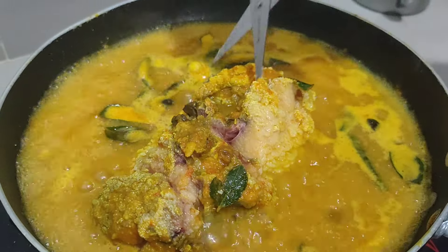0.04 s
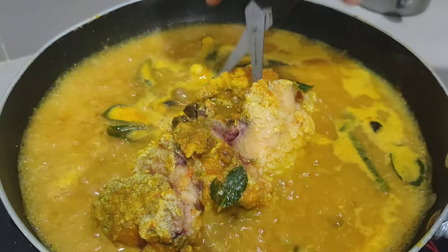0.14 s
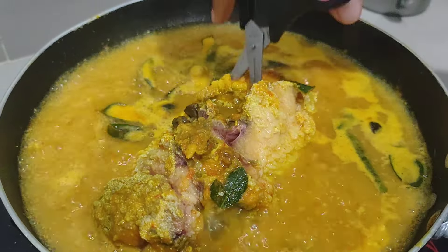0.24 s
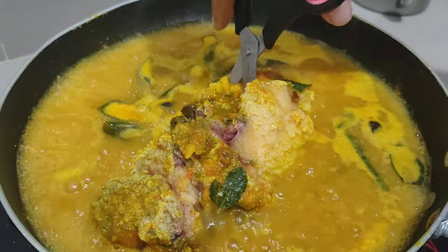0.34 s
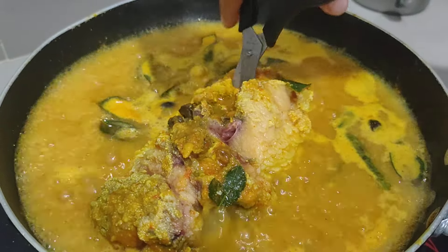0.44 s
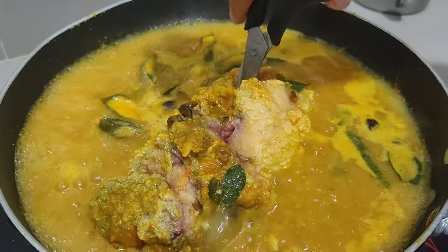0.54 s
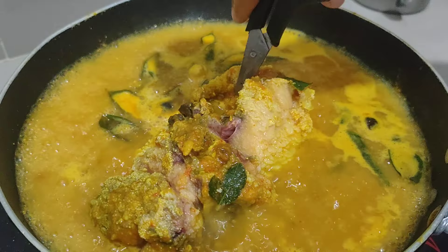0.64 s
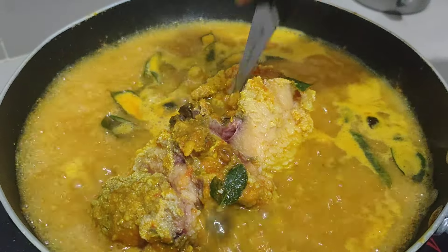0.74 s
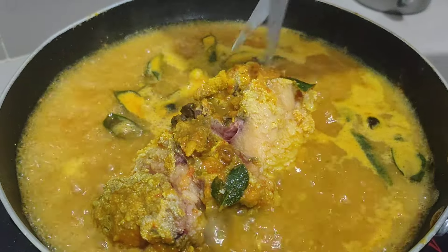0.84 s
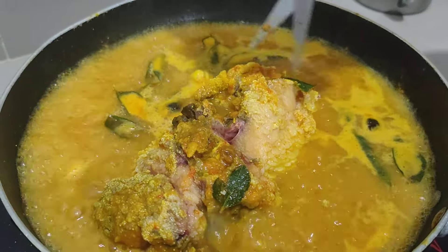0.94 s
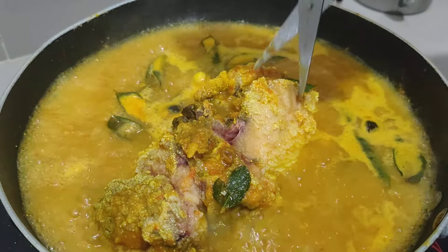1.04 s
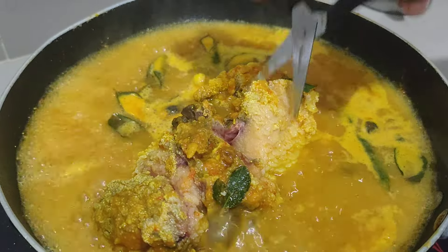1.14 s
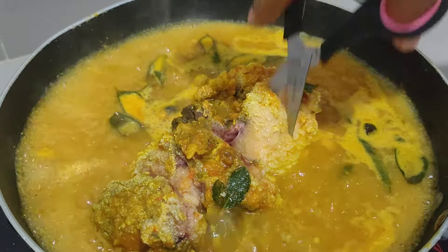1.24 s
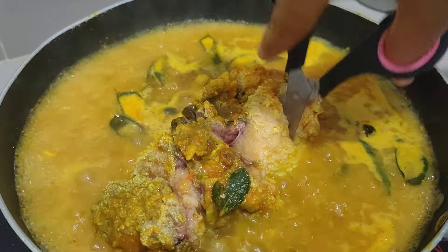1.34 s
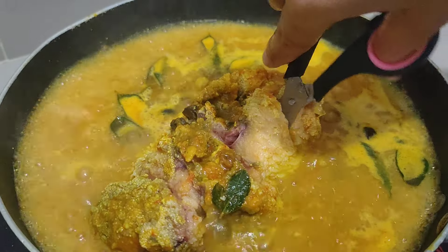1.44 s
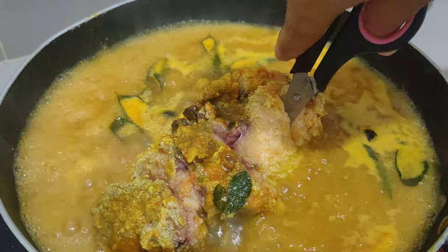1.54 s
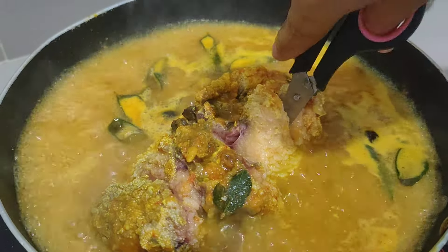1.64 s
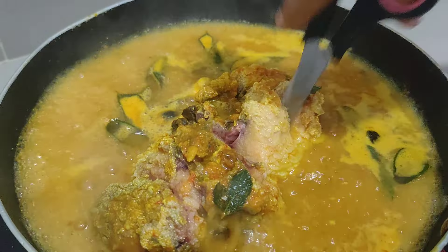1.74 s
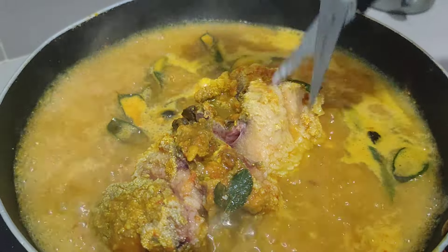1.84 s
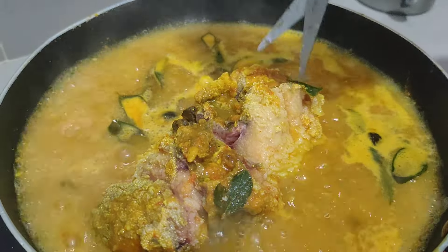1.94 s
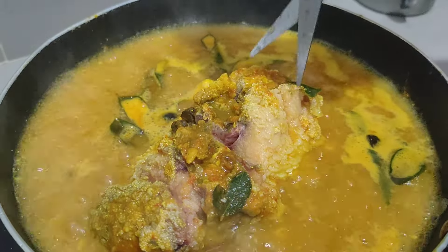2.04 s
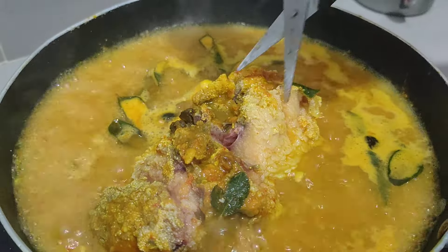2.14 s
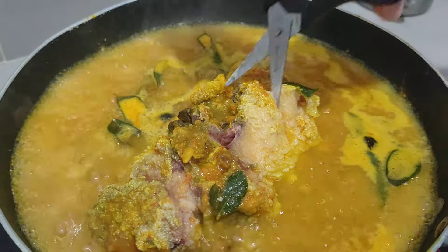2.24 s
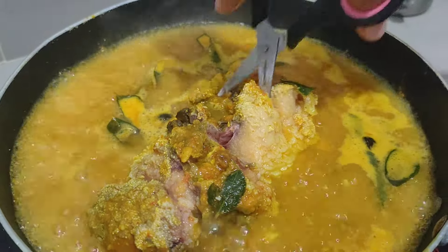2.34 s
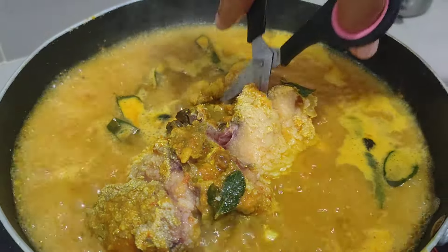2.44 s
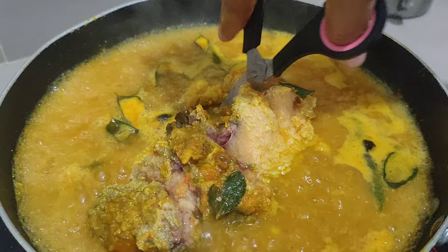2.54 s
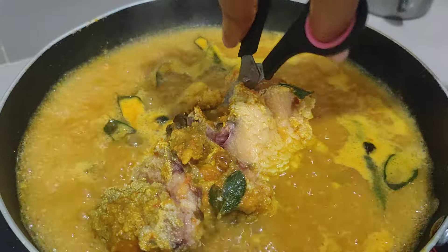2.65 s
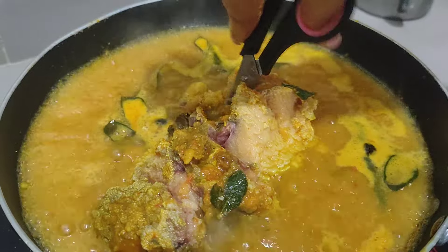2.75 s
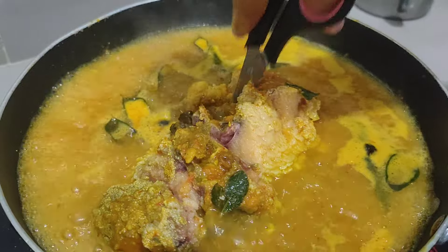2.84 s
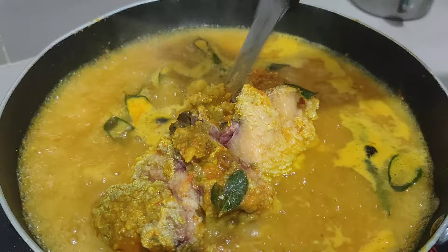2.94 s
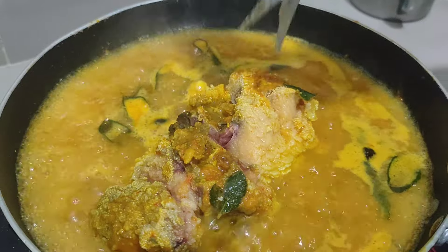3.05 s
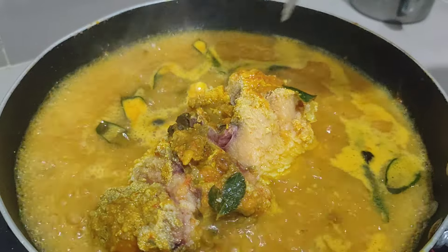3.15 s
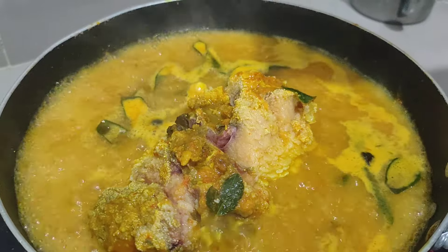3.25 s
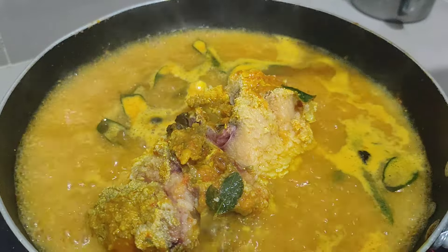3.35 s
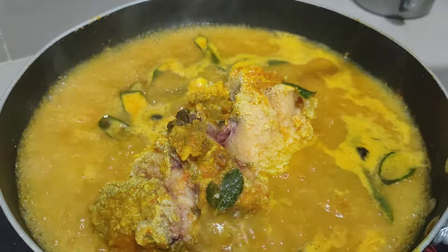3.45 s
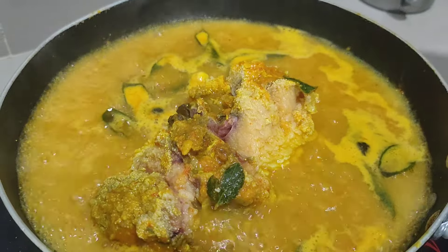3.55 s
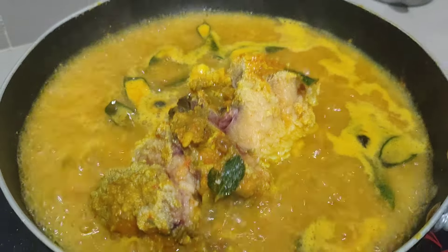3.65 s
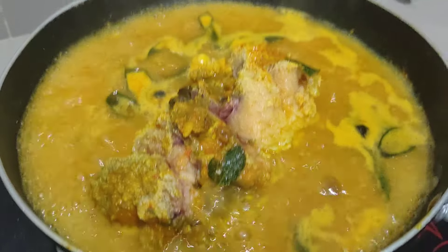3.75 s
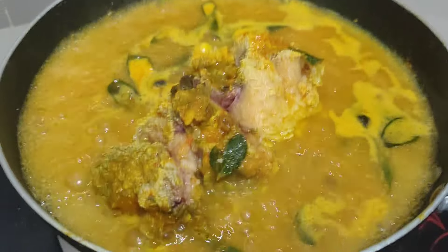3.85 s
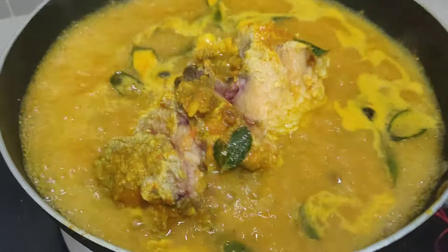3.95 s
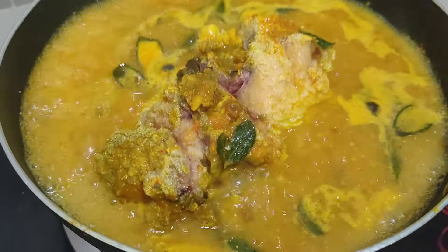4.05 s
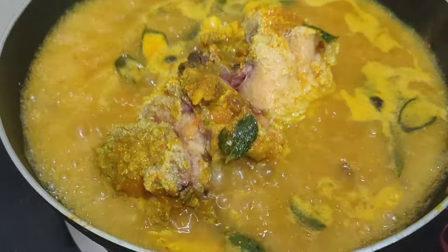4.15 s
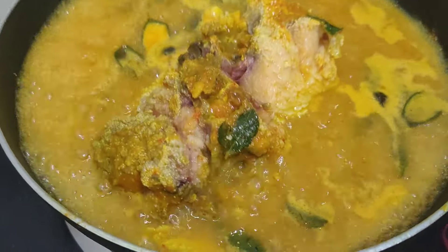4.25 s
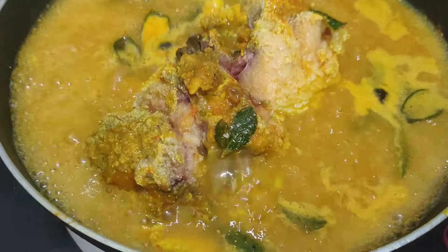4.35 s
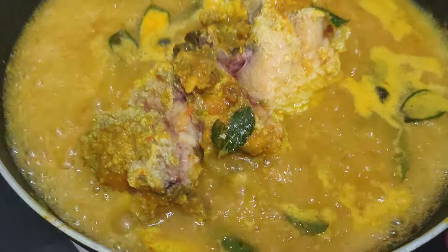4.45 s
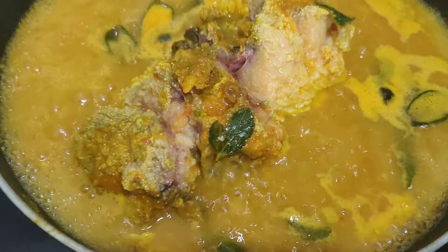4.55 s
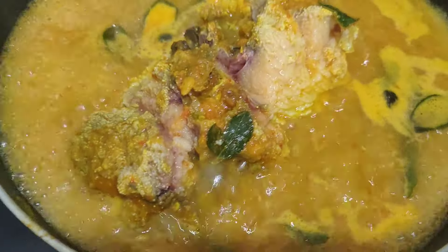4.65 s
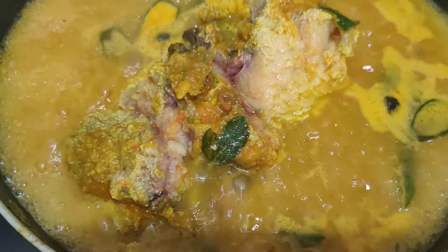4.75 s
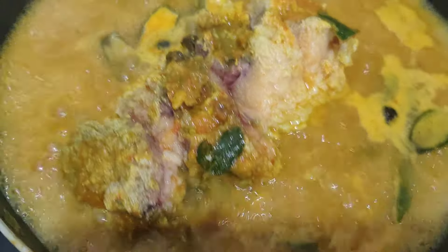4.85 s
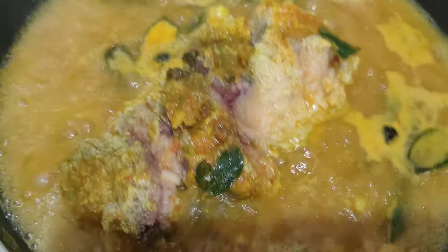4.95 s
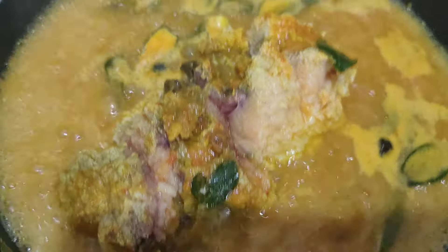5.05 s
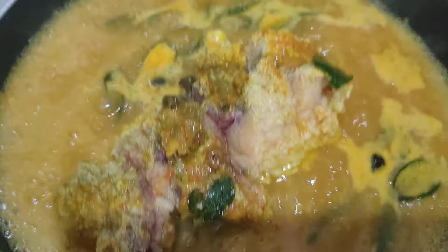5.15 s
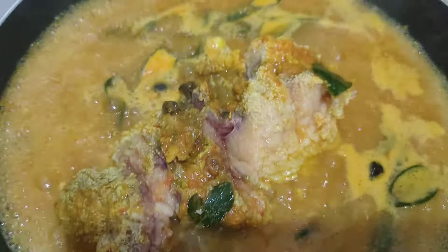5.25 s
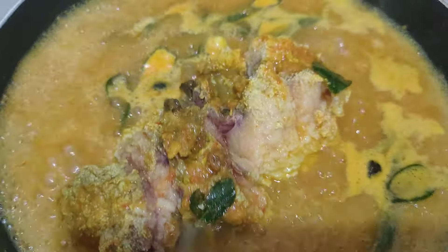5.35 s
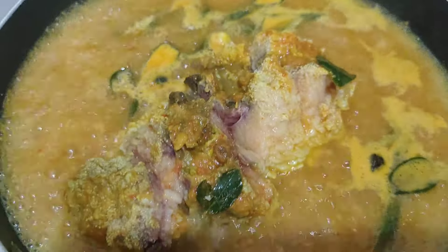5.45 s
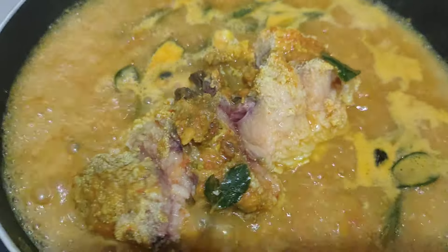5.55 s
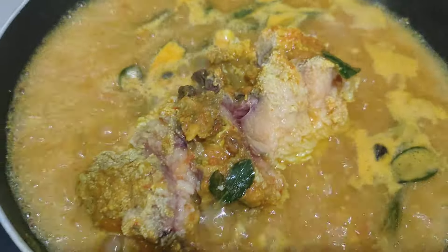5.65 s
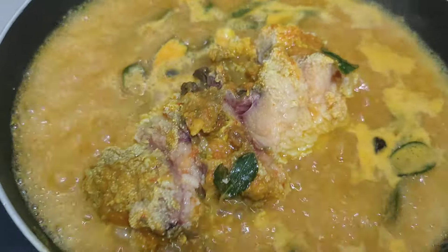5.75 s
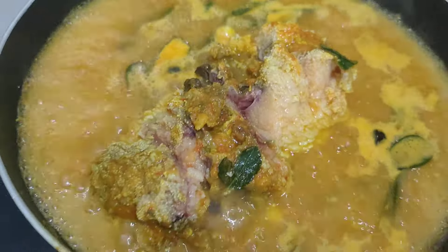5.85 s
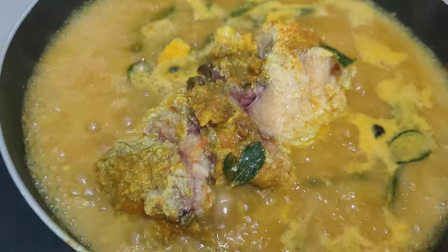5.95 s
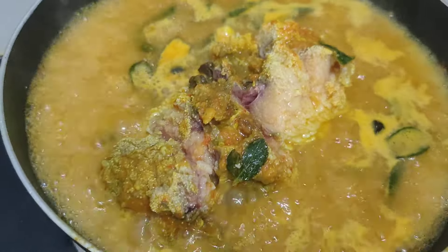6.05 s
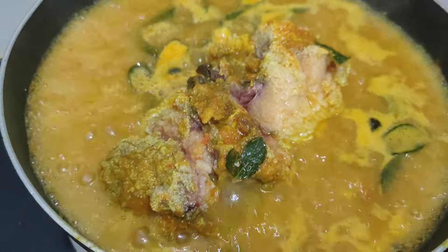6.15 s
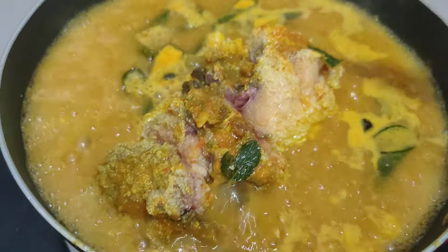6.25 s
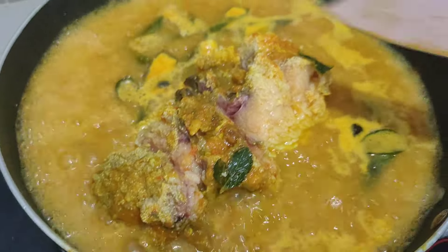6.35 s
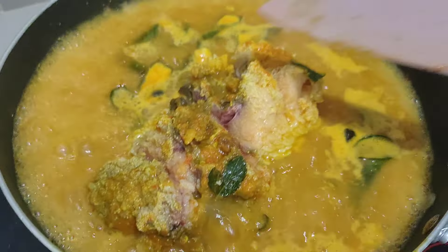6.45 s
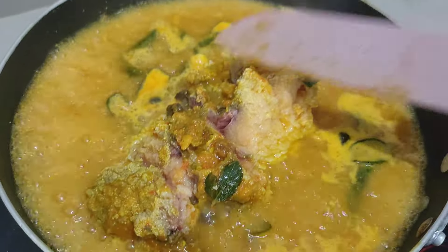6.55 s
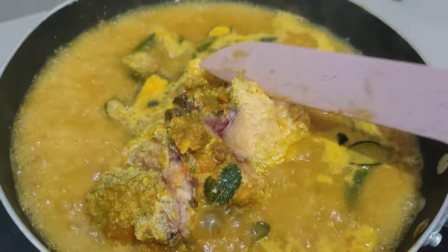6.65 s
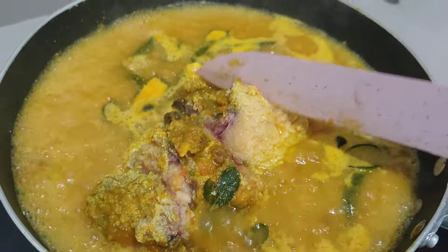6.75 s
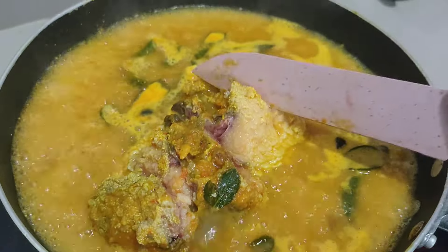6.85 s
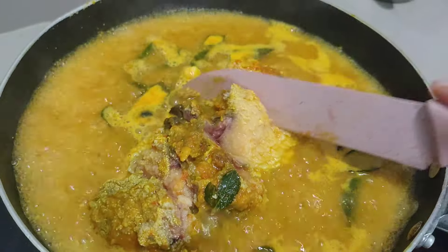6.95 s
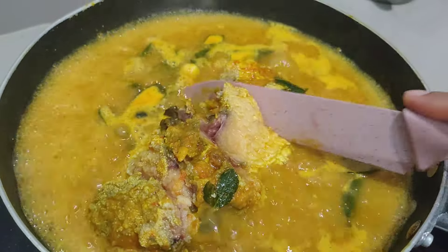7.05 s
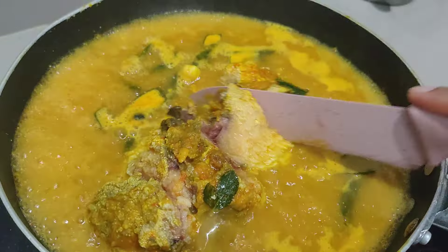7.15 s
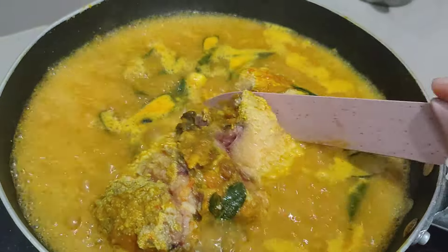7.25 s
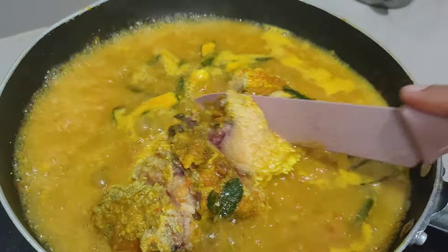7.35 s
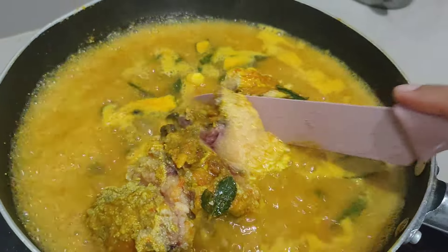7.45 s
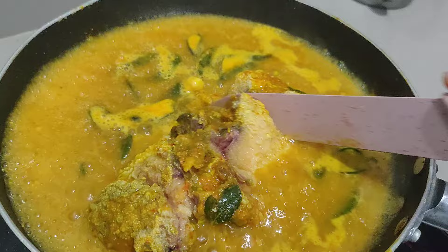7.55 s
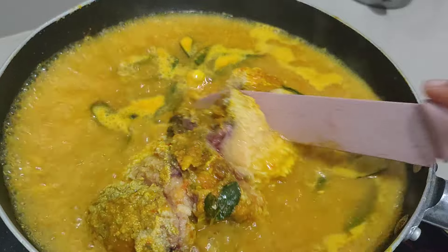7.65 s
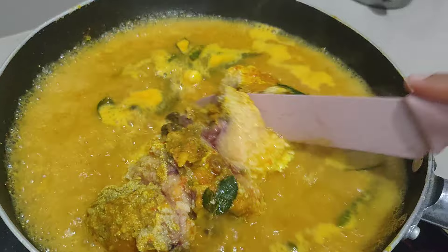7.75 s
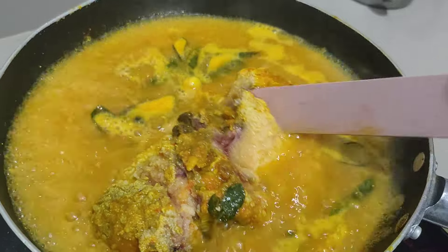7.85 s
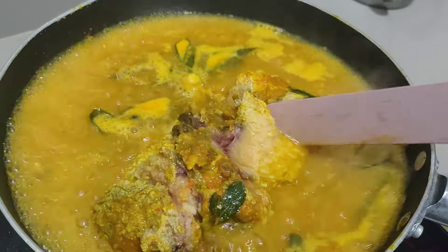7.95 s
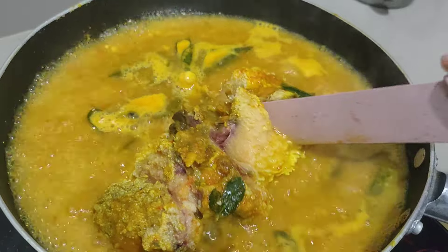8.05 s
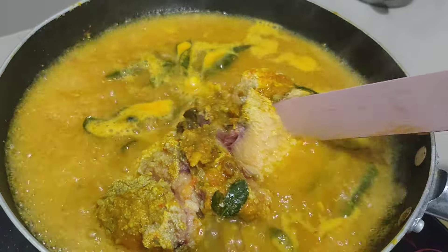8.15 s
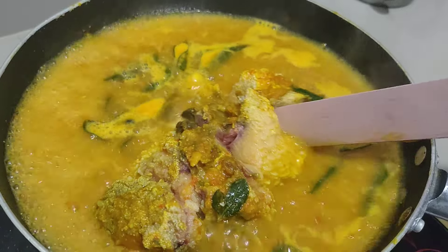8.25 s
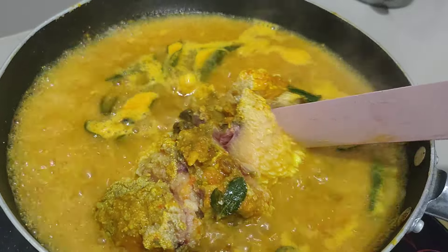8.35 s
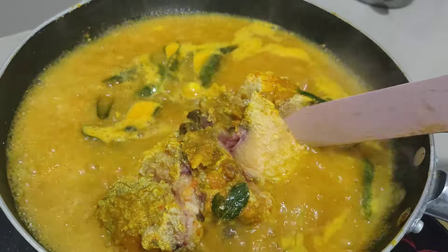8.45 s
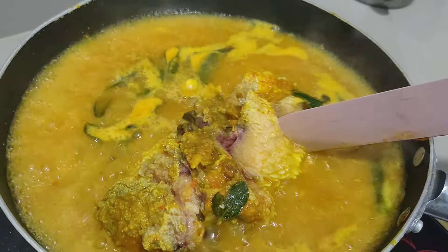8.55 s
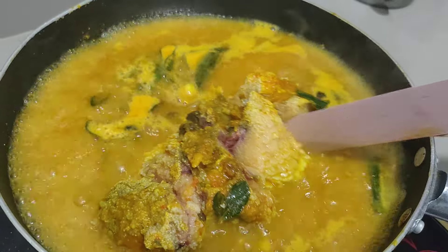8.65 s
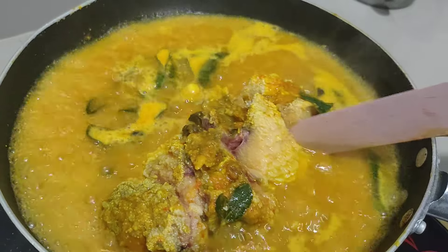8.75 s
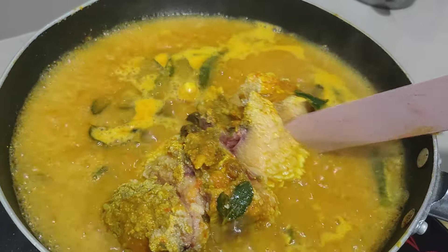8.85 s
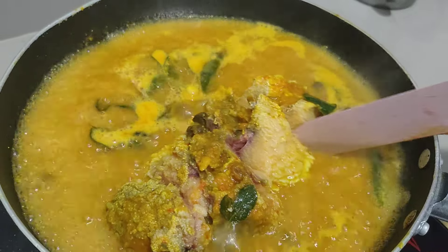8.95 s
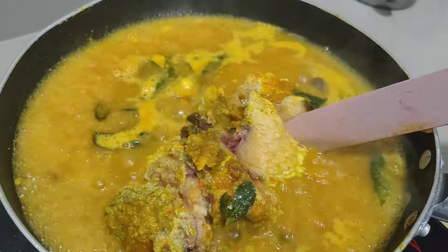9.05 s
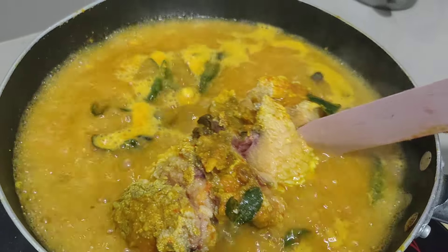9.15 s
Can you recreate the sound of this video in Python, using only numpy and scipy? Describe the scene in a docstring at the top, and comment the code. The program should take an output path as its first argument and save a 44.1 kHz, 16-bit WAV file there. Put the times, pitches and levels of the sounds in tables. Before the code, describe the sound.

Heard close up in a small kitchen, a pan of thick sauce bubbles throughout, with quick pops, a light hiss and droplets spitting on the hot rim. Three brief steel clicks come first as scissors cut a piece of meat. Later a plastic spatula gives a light tap, then a harder cluster of dry knocks on the pan, while the sauce keeps simmering.

```python
"""Thick curry simmers in a wide pan in a small kitchen. From the start, bubbles plop as their cavities
open and ring, steam surges drum on the base, and the hot rim sizzles and spits. In the first three
seconds kitchen scissors snip a piece of meat three times, the steel blades clicking shut.
Near 6.5 s a reaching arm stirs the air; then a plastic spatula pushes the meat and knocks on the pan,
hardest at 7.5 s. The steam surges under it, and the curry bubbles on to the end."""
import sys
import numpy as np
from scipy import signal
from scipy.fft import rfft, irfft, next_fast_len
from scipy.io import wavfile
from scipy.ndimage import uniform_filter1d

SR = 44100
rng = np.random.default_rng(int(sys.argv[2]) if len(sys.argv) > 2 else 0)


def store_wav(level_fs):
    """Save 16-bit WAV to argv[1]."""
    pcm = np.round(np.clip(np.atleast_2d(level_fs), -1, 1) * 32767)
    wavfile.write(sys.argv[1], SR, pcm.T.astype(np.int16))


N = 405279
TIME = np.arange(N) / SR


def from_db(db):
    """Decibels to gain."""
    return 10 ** (np.asarray(db) / 20)


def rms_one(x):
    """Scale to rms 1."""
    return x / np.sqrt(np.mean(x ** 2) + 1e-20)


def peak_one(x):
    """Scale to peak 1."""
    return x / np.abs(x).max()


def automation(rows):
    """Turn breakpoints (time_s, values...) into one curve for each value column."""
    times, *columns = np.transpose(rows)
    return [np.interp(TIME, times, column) for column in columns]


def add(out, start_s, sound):
    """Mix a sound in at a time."""
    i = int(np.clip(start_s * SR, 0, N - 1))
    out[i:i + len(sound)] += sound[:N - i]


def low_pass(x, hz, order=2):
    """Butterworth low-pass."""
    return signal.sosfilt(signal.butter(order, hz, fs=SR, output="sos"), x + 1e-18)


def high_pass(x, hz, order=2):
    """Butterworth high-pass."""
    return signal.sosfilt(signal.butter(order, hz, "high", fs=SR, output="sos"), x + 1e-18)


def coloured(x, spectrum):
    """Shape a steady sound with an EQ curve (freq_hz, gain_db); rms 1."""
    hz, db = np.transpose(spectrum)
    size = next_fast_len(N)
    bins_hz = np.maximum(np.fft.rfftfreq(size, 1 / SR), 1)
    gain = from_db(np.interp(np.log(bins_hz), np.log(hz), db, left=-120, right=-120))
    return rms_one(irfft(rfft(x, size) * gain, size)[:N])


def resonate(x, resonances):
    """Parallel resonances (pitch_hz, width_hz, gain_db) with alternating signs."""
    out = 0
    for k, (hz, width_hz, db) in enumerate(resonances):
        radius = np.exp(-np.pi * width_hz / SR)
        poles = [1, -2 * radius * np.cos(2 * np.pi * hz / SR), radius ** 2]
        band = (1 - radius ** 2) / 2 * signal.lfilter([1, 0, -1], poles, x + 1e-18)
        out = out + (-1) ** k * from_db(db) * band
    return out


def dying_noise(t60_s):
    """A burst of noise that falls 60 dB."""
    t = TIME[:int(t60_s * SR) + 2]
    return rng.standard_normal(len(t)) * from_db(-60 * t / t60_s)


def grains(per_s, spread_db):
    """Random clicks of uneven size."""
    clicks = (rng.random(N) < per_s / SR) * rng.choice([-1, 1], N)
    return clicks * from_db(spread_db * np.minimum(rng.exponential(1, N), 4))


def kitchen(x, wet_db=-17, t60_s=0.4, top_hz=6000):
    """A short diffuse tail comes off the tiles, 5 ms late."""
    tail = low_pass(dying_noise(t60_s), top_hz)
    tail = np.concatenate([np.zeros(SR // 200), tail])
    return from_db(wet_db) * signal.fftconvolve(x, tail / np.linalg.norm(tail))[:N]


# The dip in the pan's tone, shifting as the microphone leans in: time_s, centre_hz
NOTCH_SWEEP = [(0, 2400), (3.7, 2330), (4.8, 2970), (6.0, 2690), (6.8, 2870), (9.19, 2950)]


def pan_reflection(x, depth=0.8, half_width_hz=110):
    """A reflection off the pan partly cancels one narrow, moving band."""
    centre_hz, = automation(NOTCH_SWEEP)
    carrier = np.exp(2j * np.pi * np.cumsum(centre_hz) / SR)
    band = 2 * np.real(carrier * low_pass(x / carrier, half_width_hz, order=1))
    return x - depth * band


# Fader ride for the moving air: time_s, level_db
DRAUGHT_RIDE = [(0, -81.5), (6.5, -80), (6.57, -53), (6.66, -64), (6.75, -80), (9.19, -84.5)]


def draught():
    """Air stirred by the reaching arm makes a soft, deep puff."""
    level_db, = automation(DRAUGHT_RIDE)
    return from_db(level_db) * rms_one(low_pass(rng.standard_normal(N), 65))


def drumming(resonances, per_s, spread_db):
    """Soft random collapses excite a body's resonances, evened to rms 1."""
    drum = resonate(grains(per_s, spread_db), resonances)
    local_power = np.abs(uniform_filter1d(drum ** 2, size=3500))
    return drum / np.sqrt(local_power + 1e-12)


# Low tones of the pan's base: pitch_hz, width_hz, gain_db
BASE_TONES = [(97.3, 14, -0.5), (117.2, 26.5, -8.5), (157, 10.4, -4.5), (262.3, 41, -13)]
# Swells of steam, strongest when the spatula shoves the meat: start_s, hold_s, level_db
STEAM_SURGES = [(0.034, 0.088, -66.5), (0.476, 0.05, -59.5), (0.97, 0.09, -64.5), (1.217, 0.12, -57.5),
                (1.615, 0.06, -63), (1.805, 0.037, -59), (2.294, 0.11, -55), (2.564, 0.073, -52.5),
                (3.056, 0.16, -53.5), (3.7, 0.11, -54.5), (3.925, 0.12, -55), (4.117, 0.14, -55),
                (4.558, 0.036, -58.5), (4.754, 0.035, -54), (4.92, 0.04, -53.5), (5.052, 0.035, -50),
                (5.232, 0.062, -52.5), (5.43, 0.06, -55.5), (5.583, 0.19, -52.5), (5.785, 0.15, -50.5),
                (6.238, 0.12, -52), (6.666, 0.054, -54.5), (6.76, 0.11, -49), (7.152, 0.04, -54.5),
                (7.296, 0.038, -50), (7.57, 0.023, -46), (7.785, 0.065, -45.5), (8.218, 0.033, -56.5),
                (8.412, 0.06, -58), (8.617, 0.13, -56), (8.904, 0.069, -56.5), (9.12, 0.068, -57)]


def steam_rumble(resting_db=-76, rise_20db_s=0.089, fall_20db_s=0.19):
    """Steam pockets collapse against the base and drum on it; each surge swells, holds and ebbs."""
    power = from_db(resting_db) ** 2
    for start_s, hold_s, level_db in STEAM_SURGES:
        fade_in = np.maximum(start_s - TIME, 0) / rise_20db_s
        fade_out = np.maximum(TIME - start_s - hold_s, 0) / fall_20db_s
        power = power + from_db(level_db - 20 * (fade_in + fade_out)) ** 2
    return np.sqrt(power) * drumming(BASE_TONES, per_s=460, spread_db=3)


# Tones of the steam pockets round the meat: pitch_hz, width_hz, gain_db
GURGLE_TONES = [(240.5, 54, -2.5), (290, 50, -2), (357, 30, -2)]
# Fader ride for the heaving sauce, with a few lulls: time_s, level_db
HEAVE_RIDE = [(0.0, -56), (0.26, -77), (0.44, -79), (0.54, -60), (1.12, -67), (1.5, -61.5), (2.0, -64),
              (2.56, -60), (5.7, -62), (6.1, -67.5), (7.3, -61.5), (7.47, -84), (7.66, -48.5),
              (8.02, -82.5), (8.18, -87), (8.26, -60.5), (9.19, -64.5)]


def gurgle(gulps_per_s=5.5, swing_db=4.5, unevenness=0.25):
    """Larger steam pockets gurgle round the meat as the sauce heaves in uneven gulps."""
    heave_db, = automation(HEAVE_RIDE)
    gaps_s = np.exp(unevenness * rng.standard_normal(100)) / gulps_per_s
    gulp_count = np.interp(TIME, np.cumsum(gaps_s) - gaps_s[0], np.arange(len(gaps_s)))
    gulp_db = swing_db * np.cos(2 * np.pi * gulp_count)
    return from_db(heave_db + gulp_db) * drumming(GURGLE_TONES, per_s=300, spread_db=3.5)


# EQ of the froth, coloured by the pan's hollow: freq_hz, gain_db
FROTH_EQ = [(240, -42), (400, -18), (450, -12), (543, 4), (635, -6), (896, 6), (1020, -16.5), (1190, -1),
            (1320, -13), (1500, 7), (1640, -11.5), (1800, 4), (1980, 0), (2370, -4), (2600, -6.5),
            (3380, -45.5), (5720, -120)]


def froth(bubble_db, trim_db=-5):
    """Countless bubbles too small to tell apart blur into a bed of noise."""
    return from_db(bubble_db + trim_db) * coloured(rng.standard_normal(N), FROTH_EQ)


# EQ of the foam on the rim: freq_hz, gain_db
SIZZLE_EQ = [(1800, -27), (2370, -11), (2620, -8), (3200, -6), (4050, -4.5), (4600, -7.5), (5150, -13),
             (5800, -5.5), (6550, 1), (7150, 2), (7600, -8), (8400, -35)]


def sizzle(level_db, hiss_db=-1, crackle_db=-7):
    """Fine foam dries on the hot rim: a smooth hiss with tiny ticks in it."""
    hiss = coloured(rng.standard_normal(N), SIZZLE_EQ)
    crackle = coloured(grains(per_s=900, spread_db=7.5), SIZZLE_EQ)
    return from_db(level_db) * (from_db(hiss_db) * hiss + from_db(crackle_db) * crackle)


def faint_spits(per_s=3.2, level_db=-41, spread_db=4.5, pitch_hz=3230, octaves=0.29, colour_db=9):
    """Cues for small droplets at random moments, each with its own size, pitch and colour."""
    count = int(per_s * TIME[-1])
    starts_s = rng.uniform(0, TIME[-1], count)
    return [(start_s, level_db + spread_db * size, pitch_hz * 2 ** (octaves * pitch), colour_db * colour)
            for start_s, (size, pitch, colour) in zip(starts_s, rng.standard_normal((count, 3)))]


# The loudest spits: start_s, level_db, lower_hz, brightness_db (tilts toward the upper ring)
SPIT_CUES = [(1.0848, -35.5, 3930, 9), (1.6578, -36, 4210, -2), (1.96, -29.5, 3520, 5),
             (2.0112, -32, 3400, -15), (2.353, -32.5, 3770, 6), (2.5302, -36.5, 3860, -5),
             (2.834, -33, 3740, -7), (2.912, -34.5, 2730, -15), (3.0188, -31, 3320, 8),
             (3.5154, -37, 3460, -10), (3.7451, -34, 3630, 7), (3.8146, -33, 3510, 14),
             (3.919, -34, 3520, -10), (3.9865, -28.5, 3320, 15), (4.0463, -36.5, 2910, -13),
             (4.1413, -28, 3850, 10), (4.445, -31.5, 3630, 6), (4.4827, -28.5, 3650, -1),
             (4.7534, -32.5, 4070, -4.5), (5.1939, -30, 3280, -11.5), (6.289, -38, 3720, 14),
             (6.5892, -35.5, 3813, -11), (7.3168, -32, 3760, 12), (7.651, -32, 3600, -4),
             (7.7508, -34, 3820, 0), (8.3685, -35, 3610, -1), (8.6617, -26, 3800, 15),
             (8.946, -34, 3980, 12), (8.9827, -31, 4280, 4), (9.159, -31.5, 3900, 11)]


def spits(t60_s=0.024, lower_width_hz=1700, upper_hz=6700, upper_width_hz=1200, upper_trim_db=-1):
    """Droplets snap on the hot wall, each with its own mix of a lower and an upper ring."""
    def snap(hz, width_hz):
        """A noise burst rung twice through one resonance."""
        band = [(hz, width_hz, 0)]
        return rms_one(resonate(resonate(dying_noise(t60_s), band), band))

    out = np.zeros(N)
    for start_s, level_db, lower_hz, brightness_db in list(SPIT_CUES) + faint_spits():
        lower = snap(lower_hz, lower_width_hz)
        upper = from_db(brightness_db + upper_trim_db) * snap(upper_hz, upper_width_hz)
        add(out, start_s, from_db(level_db) * peak_one(lower + upper))
    return out


# Bright ring of small sharp contacts: pitch_hz, width_hz, gain_db
CLICK_TONES = [(1680, 690, -5), (4000, 670, 0), (5800, 310, -3.5), (6400, 1240, -1.5), (7020, 730, 2)]


def sharp_click(t60_s):
    """A small contact patch radiates treble and little bass."""
    return np.diff(resonate(dying_noise(t60_s), CLICK_TONES))


# Blade clicks, grouped into three snips: start_s, level_db, t60_s
SNIP_CUES = [(0.477, -26, 0.023), (0.4814, -14, 0.0044), (0.4833, -26.5, 0.038), (1.414, -32, 0.056),
             (1.427, -38, 0.051), (1.435, -22.5, 0.023), (2.6527, -21.5, 0.0087)]


def scissors():
    """Steel blades graze and close with a short bright click, damped by meat and hand."""
    out = np.zeros(N)
    for start_s, level_db, t60_s in SNIP_CUES:
        add(out, start_s, from_db(level_db) * peak_one(sharp_click(t60_s)))
    return out


# Modes of the loaded pan: pitch_hz, gain_db, t60_s
PAN_MODES = [(249, -41, 0.16), (364, -28, 0.06), (505, -24.5, 0.048), (877, -20, 0.081), (1093, -23.5, 0.1),
             (1143, -15, 0.024), (1350, -23, 0.016), (1630, -24, 0.032), (1860, -10, 0.042),
             (2080, -5, 0.034), (2380, -27, .025)]


def pan_ring(force):
    """A blow sets the pan's damped modes ringing, with alternating signs."""
    out = 0
    for k, (hz, db, t60_s) in enumerate(PAN_MODES):
        radius = from_db(-60 / (t60_s * SR))
        poles = [1, -2 * radius * np.cos(2 * np.pi * hz / SR), radius ** 2]
        out = out + (-1) ** k * from_db(db) * signal.lfilter([.5, 0, -.5], poles, force + 1e-18)
    return out


# Spatula hits on the pan: start_s, strength_db, hardness_hz (low-pass cutoff)
KNOCK_CUES = [(6.835, -21.5, 1750), (6.8385, -19.5, 1200), (7.5125, -8, 6000), (7.5168, -17.5, 5000),
              (7.5677, -8.5, 1050), (7.579, -20, 500), (7.589, -11.5, 704), (7.7503, -34, 1200)]


def spatula(ring_db=-1, clack_db=-5, crack_db=-8.5, thud_db=-28):
    """A knock is a dry plastic clack and crack, the pan's ring and a thud; soft hits lose the treble."""
    force, contacts = np.zeros(N), np.zeros(N)
    for start_s, strength_db, hardness_hz in KNOCK_CUES:
        blow = low_pass(signal.unit_impulse(SR // 100), hardness_hz, order=3)
        add(force, start_s, from_db(strength_db) * blow)
        plastic = resonate(dying_noise(t60_s=0.026), [(954, 350, 0.17), (1870, 190, 1.7)])
        clack = low_pass(plastic, 2170, order=8)
        crack = sharp_click(t60_s=0.036)
        thud = resonate(dying_noise(t60_s=0.15), BASE_TONES + GURGLE_TONES)
        for part, part_db in ((clack, clack_db), (crack, crack_db), (thud, thud_db)):
            add(contacts, start_s, from_db(strength_db + part_db) * low_pass(peak_one(part), hardness_hz))
    return contacts + from_db(ring_db) * pan_ring(force)


def plop(hz, cycles, glide=0.22, stretch=1.028):
    """An opening cavity rings, rising in pitch as the hole widens; returns its swell time and wave."""
    swell_s = stretch * cycles / hz
    age = TIME[:int(5 * swell_s * SR)] / swell_s  # 1 at the envelope's peak
    pitch_hz = hz * (1 + glide * rng.uniform(0.5, 1.5) * np.tanh(2 * (age - 1)))
    envelope = (age * np.exp(1 - age)) ** 4
    return swell_s, envelope * np.sin(2 * np.pi * (np.cumsum(pitch_hz) / SR + rng.random()))


def small_bubbles(bubble_db, per_s=480, spread_db=5.5, top_db=-37, centre_hz=1300, octaves=0.381):
    """Little bubbles burst in a steady patter, at pitches scattered round a centre."""
    out = np.zeros(N)
    for i in np.flatnonzero(rng.random(N) < per_s / SR):
        level_db = bubble_db[i] - 3.5 + rng.exponential(spread_db)
        hz = centre_hz * 2 ** rng.logistic(0, octaves)
        if level_db < top_db and 250 < hz < 2400:
            _, wave = plop(hz, cycles=1.74 * 2 ** rng.uniform(-0.7, 0.7))
            muffling = min(1, hz / centre_hz) ** 0.7  # low bubbles lie deeper in the sauce
            add(out, i / SR, from_db(level_db) * muffling * wave)
    return out


def lesser_pops(loud_pops, bubble_db, gap_s=0.065, level_db=-36, spread_db=1.8, pitch_hz=1336):
    """Cues for weaker pops, unevenly filling the pauses between the loud ones."""
    cues = []
    edges_s = [0] + [pop[0] for pop in loud_pops] + [TIME[-1]]
    swing_db = 0.52 * (bubble_db - bubble_db.mean())  # they follow about half the simmer's swing
    for start_s, end_s in zip(edges_s, edges_s[1:]):
        slots = max(round((end_s - start_s) / gap_s), 1)
        for slot_s in np.linspace(start_s, end_s, slots + 1)[1:-1]:
            peak_s = rng.normal(slot_s, gap_s / 4)
            db = rng.normal(level_db, spread_db) + np.interp(peak_s, TIME, swing_db)
            hz = pitch_hz * 2 ** rng.normal(0, 0.23)
            cycles = 1.4 * 2 ** rng.normal(0, 0.5)
            cues.append((peak_s, db, hz, cycles))
    return cues


# The loudest bursting bubbles: time_s, level_db, pitch_hz, swell_cycles (before the plop's stretch)
POP_CUES = [(0.0788, -34, 1230, 1.86), (0.1633, -34.5, 1240, 1.46), (0.3476, -32, 1050, 2.66),
            (0.457, -30.5, 1450, 0.85), (1.1543, -32, 1340, 1.8), (1.2021, -27.0, 1430, 1.5),
            (1.315, -31.5, 1290, 1.76), (1.35, -28, 1250, 0.9), (1.4522, -32.5, 1510, 1.4),
            (1.5328, -26, 1560, 1.8), (1.6133, -28.5, 1200, 3.4), (1.9615, -27, 1260, 0.89),
            (2.0117, -35.0, 1350, 2), (2.2513, -32, 1220, 0.8), (2.2969, -31.5, 1480, 1.17),
            (2.5007, -31, 1300, 1.34), (2.5308, -30, 1160, 1.5), (2.6491, -32, 1380, 1.67),
            (2.8344, -33.0, 1020, 1.5), (2.913, -32.5, 1320, 0.96), (3.0194, -31.5, 1280, 0.74),
            (3.3229, -35, 1450, 1.4), (3.3481, -34, 1320, 2.3), (3.5156, -37.5, 890, 1.26),
            (3.7159, -29.5, 1560, 1.36), (3.8878, -30.5, 1090, 0.72), (3.9185, -33, 1570, 1.3),
            (3.9535, -32.5, 1250, 1.4), (3.9869, -28, 1200, 0.44), (4.0275, -26.5, 1550, 1.23),
            (4.0959, -27, 1140, 1.35), (4.2058, -31.5, 1240, 1.97), (4.276, -29, 1680, 1.6),
            (4.3814, -26.5, 1260, 0.7), (4.4437, -26.5, 1670, 1.03), (4.4837, -29.0, 1100, 0.74),
            (4.5284, -33, 1430, 2.3), (4.598, -31.5, 1000, 1.15), (4.661, -29.5, 1180, 0.86),
            (4.7548, -23.5, 1460, 0.76), (4.8, -25, 1700, 1.26), (4.8808, -25.5, 1360, 1.53),
            (4.9266, -24, 1700, 2), (5.0094, -24, 1540, 1.97), (5.0936, -28.5, 1210, 0.82),
            (5.1902, -23.5, 1490, 0.71), (5.2172, -31, 1400, 1.3), (5.2462, -24, 1610, 2.36),
            (5.5338, -21, 1370, 1), (5.5815, -27.5, 1370, 2.34), (5.6191, -27, 1550, 1.7),
            (5.7298, -26.5, 1210, 1.27), (5.8072, -27.5, 1540, 2.1), (5.9114, -32.5, 1520, 2.0),
            (5.9564, -26.5, 1590, 2.06), (6.046, -29, 1330, 2.2), (6.0888, -29.0, 1080, 0.71),
            (6.289, -30.5, 1390, 0.79), (6.367, -32.5, 1170, 1.07), (6.4236, -30.5, 1370, 0.82),
            (6.5527, -28.5, 1360, 1.37), (6.5883, -32, 1160, 1.07), (6.663, -28.5, 1130, 1.04),
            (6.7395, -27.5, 1550, 1.8), (6.9605, -29.0, 1290, 1.9), (7.122, -28, 1413, 2.7),
            (7.1868, -28, 1350, 1.8), (7.3123, -30, 960, 1.02), (7.3638, -27.5, 1790, 2.6),
            (7.6527, -27.5, 1440, 1.7), (7.752, -25.5, 1370, 1), (7.9032, -29, 1530, 2.1),
            (8.3705, -27.5, 1400, 1.3), (8.508, -24.5, 1820, 2.05), (8.6084, -31, 1210, 0.95),
            (8.8995, -26.5, 1360, 1.8), (8.9388, -30, 1370, 0.89), (9.0572, -33, 1520, 1.9)]


def big_bubbles(bubble_db, neighbour_s=0.004964, tear_s=0.0015, close_s=0.00385, early_s=0.0001):
    """A small neighbour bursts; the big bubble's skin tears on a low note, it plops, the crater closes."""
    out = np.zeros(N)
    for time_s, db, hz, cycles in list(POP_CUES) + lesser_pops(POP_CUES, bubble_db):
        neighbour = (time_s - neighbour_s * rng.uniform(0.5, 1.5), db - rng.uniform(9, 17), 0.87 * hz, 1)
        tear = (time_s - tear_s, db - 15, 0.38 * hz, 1)
        burst = (time_s, db, hz, cycles)
        close_hz = hz * 2 ** rng.uniform(-0.5, 0.5)
        close = (time_s + close_s * rng.uniform(0.3, 1.3), db - rng.uniform(12, 18), close_hz, 2)
        for part_s, part_db, part_hz, part_cycles in (neighbour, tear, burst, close):
            swell_s, wave = plop(part_hz, part_cycles)
            add(out, part_s - swell_s - early_s, from_db(part_db) * wave)
    return out


# Tones of the air between the sauce and the pan's walls: pitch_hz, width_hz, gain_db
HOLLOW_TONES = [(534.5, 68, 6.5), (914, 250, -4.5), (1170, 34, -1.5), (1475, 56, -3.5), (1850, 160, -7)]


def bubbling_sauce(bubble_db, top_hz=2400, echo_s=0.003395, echo_db=-15, hollow_db=-2):
    """Bubbles, dulled by the thick sauce, echo off the pan wall and ring in the pan's hollow."""
    bubbles = big_bubbles(bubble_db) + small_bubbles(bubble_db)
    pops = high_pass(low_pass(bubbles, top_hz, order=10), 180)
    # Bubbles rise all over the pan, so the echo's delay wanders.
    wander = np.interp(TIME, np.linspace(0, TIME[-1], 100), rng.uniform(-1.134, 1, 100))
    delay_s = echo_s * (1 + 0.29 * wander)
    echo = np.interp(TIME - delay_s, TIME, pops)
    return pops + from_db(echo_db) * echo + from_db(hollow_db) * resonate(echo, HOLLOW_TONES)


# Fader rides for the vigour of the simmer, before each layer's trim: time_s, bubbles_db, sizzle_db
SIMMER_RIDE = [(0.0, -55.5, -54.5), (0.92, -56, -53), (1.36, -52.5, -53), (1.79, -54, -53),
               (2.46, -53.5, -53), (2.92, -56, -53.5), (4.89, -51, -53.5), (5.14, -52.5, -53.5),
               (5.48, -51.5, -53.5), (7.14, -52.5, -55), (7.73, -51.5, -51.5), (7.96, -55, -54.5),
               (8.88, -49, -53.5), (9.19, -51, -52.5)]


def scene(bubble_trim_db=-0.68, contact_top_hz=7550):
    """Everything at the pan, heard in mono from just above it."""
    vigour_db, sizzle_db = automation(SIMMER_RIDE)
    bubble_db = vigour_db + bubble_trim_db
    contacts = low_pass(spits() + scissors() + spatula(), contact_top_hz, order=10)
    foreground = bubbling_sauce(bubble_db) + contacts
    direct = pan_reflection(foreground + froth(bubble_db) + sizzle(sizzle_db))
    low_bed = steam_rumble() + gurgle() + draught()
    return (direct + kitchen(foreground) + low_bed)[None]


def record(dry, bass_hz=46, top_hz=8150):
    """The microphone sheds the deep bass; the top is cut steeply."""
    top_cut = signal.ellip(10, .2, 80, top_hz, fs=SR, output="sos")
    return signal.sosfilt(top_cut, high_pass(dry, bass_hz))


dry = scene()
out = record(dry)
store_wav(out)
```